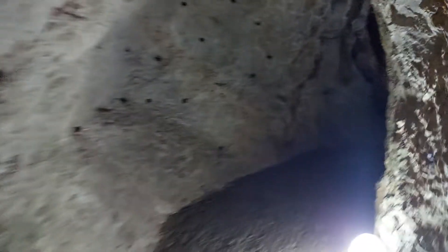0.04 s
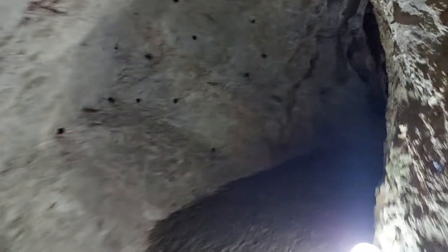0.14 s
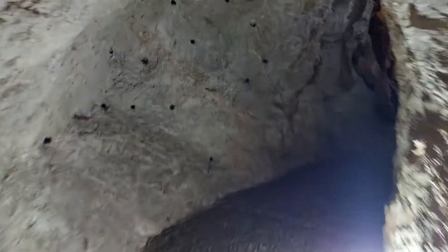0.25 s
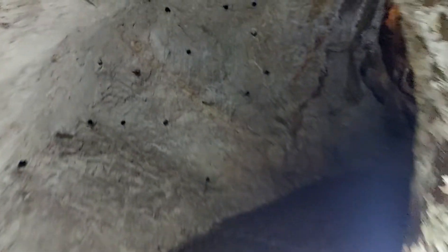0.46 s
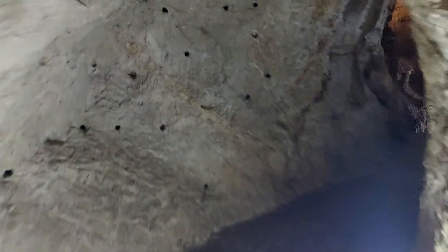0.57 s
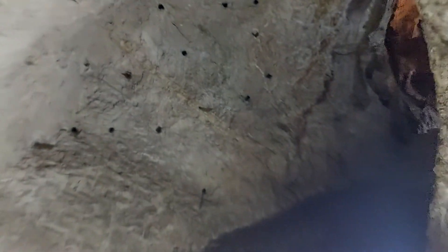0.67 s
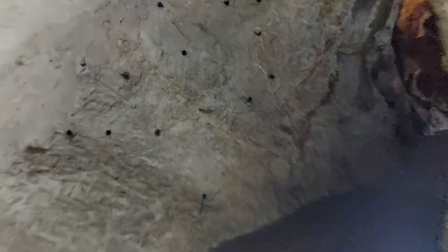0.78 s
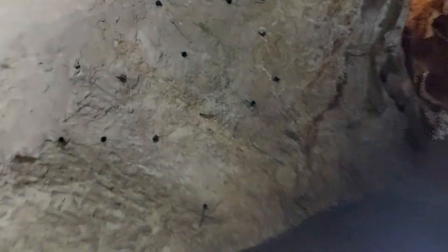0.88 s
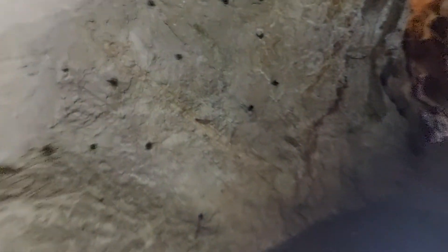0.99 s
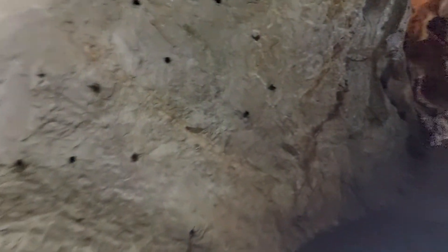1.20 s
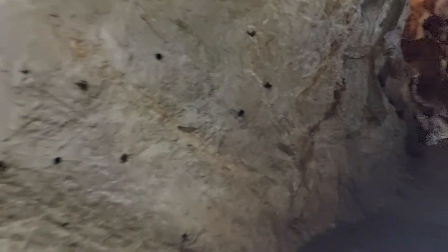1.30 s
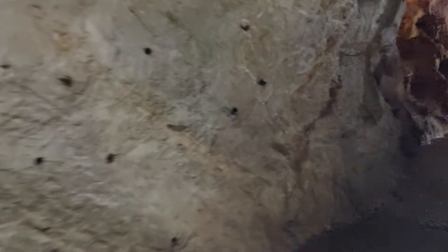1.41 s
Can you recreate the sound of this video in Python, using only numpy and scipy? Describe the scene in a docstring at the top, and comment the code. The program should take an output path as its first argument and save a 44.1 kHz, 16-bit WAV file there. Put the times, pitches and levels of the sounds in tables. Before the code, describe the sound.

Footsteps scuff on a gritty cave floor with a short echo.

```python
"""Still air hums faintly in a small cave. At 0.2 s a foot lands on the gritty floor: the heel
thumps, the sole knocks and grinds over sand, and the rock chamber answers with a short bright
echo and a low boom. A second step follows at 0.8 s, and a few loose grains tick.
Near 1.4 s a third, softer scuff begins."""
import sys
import numpy as np
from scipy import signal
from scipy.fft import rfft, irfft, next_fast_len
from scipy.io import wavfile

SR = 44100
rng = np.random.default_rng(int(sys.argv[2]) if len(sys.argv) > 2 else 0)


def materialize(psi):
    """Save the field psi as 16-bit PCM at rate SR to the path in sys.argv[1].

    A 1-D psi becomes a single channel; in a 2-D psi each row is a channel.
    """
    bounded = np.clip(np.atleast_2d(psi).T, -1, 1)
    quanta = np.round(bounded * 32767).astype(np.int16)
    wavfile.write(sys.argv[1], SR, quanta)


N = 63945


def amp(db):
    """Turns decibels (dB) into a number to multiply by."""
    return 10 ** (np.asarray(db) / 20)


def unit(x):
    """Scales a sound to an average power of 1."""
    return x / np.sqrt(np.mean(x ** 2) + 1e-20)


def read(points, hz):
    """Looks up a value between a table's rows, with every octave equally wide."""
    f, value = np.transpose(points)
    return np.interp(np.log(hz + 1), np.log(f + 1), value)


def fade(t, t60):
    """Dies away by 60 dB in t60 seconds, the fade time."""
    return np.exp(-np.log(1000) * t / max(t60, 1e-3))


def clock(length):
    """Counts the seconds through a sound of this length."""
    return np.arange(int(length * SR) + 1) / SR


def add(mix, start, sound):
    """Mixes a sound in at a start time in seconds."""
    part = mix[..., max(round(start * SR), 0):][..., :sound.shape[-1]]
    part += sound[..., :part.shape[-1]]


def colour(x, points, size=2048):
    """Shapes the tone of a sound to follow rows of frequency and strength."""
    log_gain = np.log(amp(read(points, abs(np.fft.fftfreq(size, 1 / SR)))))
    response = np.exp(np.conj(signal.hilbert(log_gain)))  # rings after a hit, never before
    taps = np.fft.ifft(response).real[:size // 2]
    taps = taps / np.linalg.norm(taps)
    return signal.oaconvolve(np.atleast_2d(x), taps[None], axes=1)[:, :x.shape[-1]]


def pair(x):
    """Makes left and right alike in the bass, as two close microphones hear them."""
    # Each row: frequency in Hz, how alike the sides are (1 is the same, 0 is unrelated).
    likeness = [(40, 0.8), (130, 0.73), (280, 0.65), (500, 0.77), (1000, 0.39), (16000, -0.0751)]
    size = next_fast_len(x.shape[1], True)
    a, b = rfft(x, size)
    same = np.clip(read(likeness, np.fft.rfftfreq(size, 1 / SR)), -1, 1)
    mid, side = a * np.sqrt((1 + same) / 2), b * np.sqrt((1 - same) / 2)
    return irfft(np.array([mid + side, mid - side]), size)[:, :x.shape[1]]


def air(hiss_db=-67.5, hum_db=-75, hum_hz=95, hum_width_hz=12):
    """Still cave air: a soft hiss, and a narrow band of noise that makes a wavering hum."""
    # The tone of the air. Each row: frequency in Hz, strength in dB.
    air_tone = [(20, -12), (50, -2), (95, 1), (140, -4), (270, 0), (450, -7), (800, -14), (1400, -13),
                (2500, -21), (8000, -24), (16000, -25)]
    hiss = unit(colour(rng.standard_normal((2, N)), air_tone))
    offset = (np.fft.rfftfreq(N, 1 / SR) - hum_hz) / hum_width_hz
    hum = unit(irfft(rfft(rng.standard_normal(N)) * np.exp(-offset ** 2), N))
    return amp(hiss_db) * pair(hiss) + amp(hum_db) * hum


def grains(size, per_second=6500, spread_db=4.5):
    """Sand crackles as many tiny clicks, a few much louder than the rest."""
    out = np.zeros((2, size))
    height = np.minimum(rng.exponential(1, out.shape), 4)
    sign = np.sign(rng.random(out.shape) - .5)
    hit = rng.random(out.shape) < per_second / SR
    out[hit] = sign[hit] * amp(spread_db * height[hit])
    return unit(out)


def scuffs(size=16384):
    """The sliding sole rubs, crunches coarse grit and makes fine sand fizz."""
    # Each row is one slide: start, rise, hold and fade time in seconds, rub level in dB,
    # grit level in dB, grit pitch in Hz, fizz level in dB.
    slides = [(0.197, 0.015, 0.016, 0.056, -49.5, -50, 5100, -56.5),
              (0.226, 0.008, 0.0049, 0.051, -44.5, -44.5, 3230, -52.5),
              (0.245, 0.0031, 0.014, 0.05, -44, -38.5, 3790, -38),
              (0.333, .004, 0.034, 0.058, -63, -57, 3870, -63),
              (0.789, 0.0016, 0.059, 0.13, -56.5, -68.5, 4100, -68),
              (.899, 0.0013, 0.019, 0.089, -53.5, -50, 6000, -56),
              (.912, 0.03, 0.005, 0.095, -47.5, -55, 5430, -51.5),
              (1.119, 0.044, 0.18, 0.49, -74.5, -74.5, 4470, -100),
              (1.386, 0.0013, 0.089, 0.2, -62.5, -53.5, 1560, -85)]
    # The tone of coarse grit. Each row: multiple of its pitch, strength in dB.
    grit_tone = [(.1, -22.5), (.4, -17), (.62, -1), (.8, 2.5), (1.25, -2), (1.75, -6), (2.3, -16), (5, -27)]
    # The tones of the low rub and the high fizz. Each row: frequency in Hz, strength in dB.
    rub_tone = [(30, -28.5), (55, 8), (200, 3), (550, 2.5), (900, -1), (1500, 4), (2300, -7), (4000, -15),
                (16000, -35)]
    fizz_tone = [(1000, -29), (5000, -14.5), (7800, 0), (8700, -4), (10800, 1), (11400, 7), (12800, 4),
                 (14000, -1), (15300, 0.5)]
    t = np.arange(size) / SR
    rub, fizz, grit = np.zeros(N), np.zeros(N), np.zeros((2, N))
    for start, rise, hold, release, rub_db, grit_db, grit_hz, fizz_db in slides:
        swell = np.minimum(t / max(rise, 1e-3), 1) ** 2
        stroke = swell * fade(np.maximum(t - rise - hold, 0), release)
        add(rub, start, amp(rub_db) * stroke)
        add(fizz, start, amp(fizz_db) * stroke)
        tone = [(multiple * grit_hz, db) for multiple, db in grit_tone]
        add(grit, start, amp(grit_db) * colour(stroke * grains(size), tone))
    return grit + colour(rub * grains(N), rub_tone) + colour(fizz * grains(N), fizz_tone)


def knocks():
    """The shoe's hard edge meets rock in short, dull bursts of noise."""
    # Each row is one knock: start in seconds, level in dB, fade time in seconds.
    hits = [(0.2015, -40, 0.05), (0.2345, -35, 0.033), (0.3322, -36, 0.043), (.366, -37.5, 0.021),
            (0.7969, -40, 0.013), (0.8867, -34.5, 0.023), (1.3891, -53, 0.0073)]
    # The tone of a knock. Each row: frequency in Hz, strength in dB.
    knock_tone = [(40, -44.5), (150, -8), (400, -4), (700, -5), (1100, -10), (1550, -10), (2300, -21),
                  (5000, -28), (16000, -42)]
    force = np.zeros(N)
    for start, db, t60 in hits:
        add(force, start, amp(db) * fade(clock(t60), t60))
    return colour(force * rng.standard_normal((2, N)), knock_tone)


def thumps(rise_s=0.0019):
    """Weight lands on heel and sole, so shoe and ground shake with a brief low note."""
    # Each row: start in seconds, level in dB, pitch in Hz, fade time in seconds.
    landings = [(0.2019, -20.5, 327, 0.017), (0.207, -34.5, 210, 0.11), (0.229, -48, 87, 0.041),
                (.231, -27, 308, 0.054), (0.2491, -32, 276, 0.14), (0.273, -33, 269.7, 0.13),
                (.303, -33.5, 206, 0.035), (0.336, -26.5, 314.5, 0.029), (.368, -37.5, 268, 0.065),
                (0.41, -52.5, 102, 0.2), (0.446, -39.5, 358, 0.056), (0.7993, -31, 313, 0.037),
                (.817, -33.5, 263, 0.088), (.856, -42, 211.5, 0.061), (0.872, -39, 194.6, 0.075),
                (.893, -48, 100.3, 0.19), (0.934, -39.5, 291.8, 0.051), (0.953, -44, 107, 0.035),
                (1.296, -59, 288.3, .12), (1.407, -56, 85, 0.36)]
    out = np.zeros(N)
    for start, db, hz, t60 in landings:
        t = clock(t60)
        loudness = amp(db) * (1 - np.exp(-t / rise_s)) * fade(t, t60)
        add(out, start, -loudness * np.sin(2 * np.pi * hz * t))
    return out


def cave(x, delay_s=0.0047, boom_db=-51, size=32768):
    """Sound bounces off the rock as an echo, and waves trapped between the walls boom."""
    # How long the echo lasts. Each row: frequency in Hz, fade time in seconds.
    echo_times = [(60, 0.85), (250, 0.85), (500, 0.5), (1200, 0.57), (3000, 0.42), (6000, 0.41),
                  (11000, 0.26), (16000, 0.32)]
    # The cave's own notes. Each row: pitch in Hz, dB added to boom_db, fade time in seconds.
    standing_waves = [(94.96, -3, 0.93), (103, -24, 0.41), (176.2, -9, 0.31), (207.6, 5, .6),
                      (215.7, -1, 0.57), (268.77, 1.5, 0.46), (281.8, -8.5, 0.98), (325.3, -8.5, 1),
                      (333.4, -3.5, 0.56), (375, 0.5, 0.29), (409, -8, 0.63), (652, -11, 0.12)]
    t = np.arange(size) / SR
    bounces = rng.choice([-1., 1.], (2, size)) * (rng.random((2, size)) < 1 / 10)
    hz, times, bands = signal.stft(pair(bounces), SR, nperseg=256)
    bands = bands * np.exp(-np.log(1000) * times / read(echo_times, hz)[:, None])
    echo = signal.istft(bands, SR)[1][:, :size] * (t > delay_s)
    echo *= np.sqrt(2) / np.linalg.norm(echo)
    boom = sum(amp(boom_db + db) * fade(t, t60) * np.cos(2 * np.pi * pitch * t)
               for pitch, db, t60 in standing_waves)
    return signal.fftconvolve(x, echo + boom, axes=1)[:, :N]


def ticks(t60=0.0076, octave_away_db=-13, size=1024):
    """Loose grains click nearby, each a snap of noise strongest at its own pitch."""
    # Each row: start in seconds, level in dB, pitch in Hz, left minus right level in dB.
    clicks = [(.883, -47, 5000, 0), (.9005, -46, 5850, 4), (1.2702, -45.5, 14000, -2),
              (1.391, -49.5, 3930, 6)]
    out = np.zeros((2, N))
    for start, db, hz, pan_db in clicks:
        snap = amp(db) * fade(np.arange(size) / SR, t60) * rng.standard_normal((2, size))
        tone = [(hz / 2, octave_away_db), (hz, 0), (hz * 2, octave_away_db)]
        add(out, start, amp([[pan_db / 2], [-pan_db / 2]]) * colour(snap, tone))
    return out


def scene(thump_echo_db=-3, sole_direct_db=-2, tick_echo_db=-10):
    """Mixes the footsteps, their echo and the cave air."""
    weight = thumps()
    sole = pair(knocks() + scuffs())
    clicks = ticks()
    echo = cave(amp(thump_echo_db) * weight + sole + amp(tick_echo_db) * clicks)
    return weight + amp(sole_direct_db) * sole + clicks + echo + air()


def record(dry, cutoff_hz=15850, size=65536):
    """Gives each microphone its own tone, then cuts the highest treble."""
    # Each row: frequency in Hz, left minus right level in dB.
    balance = [(60, 5.5), (270, 1), (450, 3.5), (1000, 0.7), (2000, 1), (5000, 3), (9000, 3), (12000, -4.5),
               (16000, -7)]
    lean_db = read(balance, np.fft.rfftfreq(size, 1 / SR)) / 2
    heard = irfft(rfft(dry, size) * amp([lean_db, -lean_db]))[:, :N]
    treble_cut = signal.firwin(511, cutoff_hz, window=("kaiser", 9), fs=SR)
    return signal.oaconvolve(heard, treble_cut[None], "same")


dry = scene()
out = record(dry)
materialize(out)
```